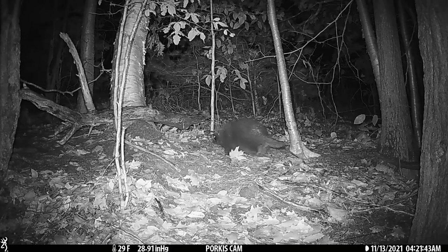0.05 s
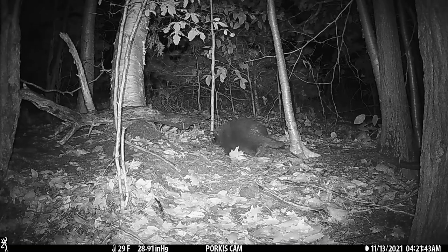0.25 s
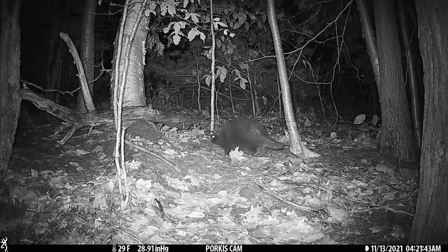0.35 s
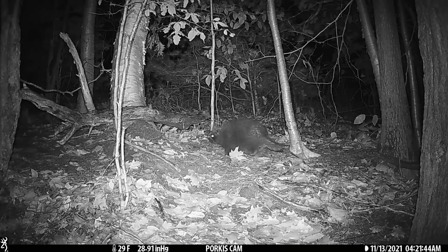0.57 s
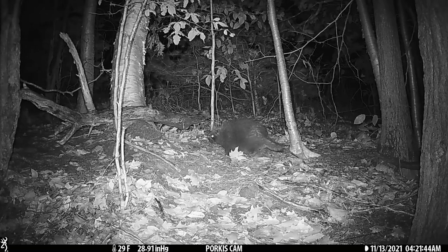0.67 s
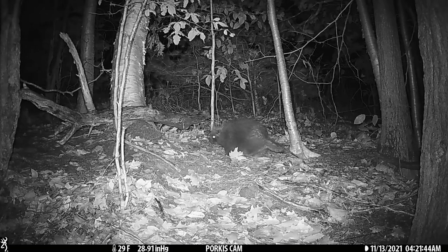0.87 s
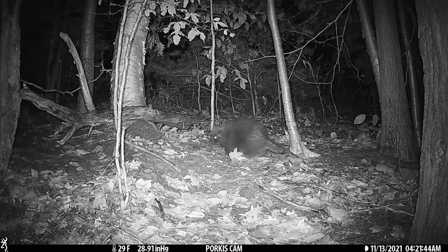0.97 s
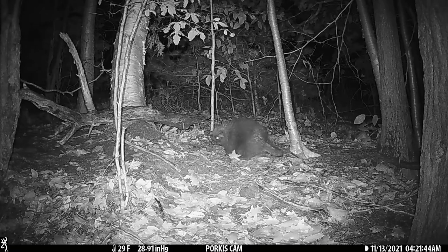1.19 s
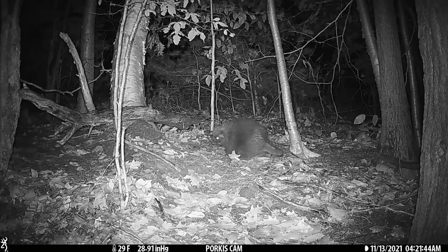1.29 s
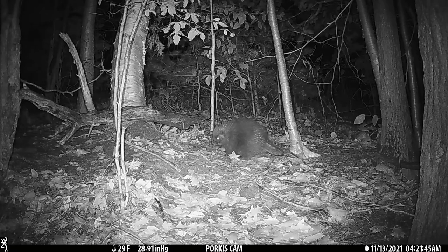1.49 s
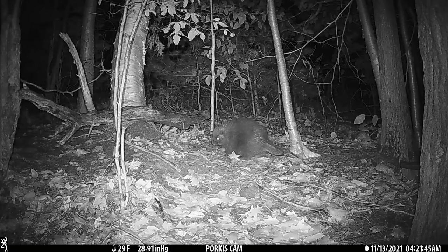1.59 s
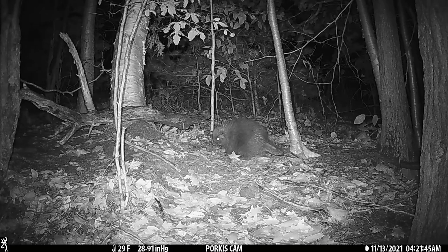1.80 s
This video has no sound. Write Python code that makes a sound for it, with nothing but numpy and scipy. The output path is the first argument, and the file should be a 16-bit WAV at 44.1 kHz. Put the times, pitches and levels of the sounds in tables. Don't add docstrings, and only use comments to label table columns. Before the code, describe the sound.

Crisp leaf rustling from an animal foraging at night, with soft electronic hiss and thin whine

```python
import sys
import numpy as np
from scipy import signal
from scipy.fft import rfft, irfft
from scipy.io import wavfile
from scipy.ndimage import uniform_filter1d

SR = 44100
rng = np.random.default_rng(int(sys.argv[2]) if len(sys.argv) > 2 else 0)


def rack_gain(trim_db):
    fader = np.asarray(trim_db, float)
    return 10 ** (fader / 20)


def dump_mix(stems):
    frames = np.atleast_2d(stems).T
    limited = np.clip(frames, -1, 1)
    pcm = np.round(limited * 32767).astype(np.int16)
    wavfile.write(sys.argv[1], SR, pcm)


N = 81585


def stirs():
    # start in seconds, length in seconds, level in dB, brightness in dB per octave.
    drags = [(0, 0.024, -53, 6.5), (.05, .022, -66, 6), (.127, 0.016, -51, -1.5), (.15, 0.0085, -62, 1),
             (.215, 0.026, -49, -1.5), (.249, 0.036, -48.5, -0.5), (.329, 0.0042, -41, -2),
             (.351, 0.017, -45.5, 12.5), (.407, 0.031, -51.5, 6), (.452, 0.052, -53.5, 4.5),
             (.502, 0.04, -50, 3), (.549, 0.011, -50.5, -2), (.375, 0.0066, -44, 10.5),
             (.658, 0.015, -57, 16.5), (.792, 0.038, -51, 1), (.82, 0.038, -52, -4),
             (.962, 0.0078, -58, 10), (1.056, 0.011, -57, 3), (1.128, 0.028, -51, -5.5),
             (1.177, 0.016, -57.5, -6), (1.232, 0.013, -52, -9), (1.267, 0.028, -48.5, -2),
             (1.324, 0.016, -50, 1), (1.349, 0.07, -48, -2.5), (1.439, 0.035, -50, -2),
             (1.472, 0.034, -52, -6), (1.506, 0.033, -51.5, -6), (1.562, 0.023, -51.5, 0),
             (1.583, 0.016, -49, -6.5), (1.637, 0.023, -51, -7)]
    return runs(drags, per_s=1100, spread_db=4.2, gain_db=10.5, fade_db=4.5)


def crushes():
    # start in seconds, length in seconds, level in dB, brightness in dB per octave.
    bursts = [(.092, 0.0082, -55, 14), (.259, 0.0027, -44.5, 3), (.3025, 0.0054, -43, 11),
              (.316, 0.014, -42.5, -6), (.3455, 0.0052, -35.5, 4), (.335, 0.0058, -38, 16.5),
              (.386, 0.005, -38, 18.5), (.397, .009, -43, 8), (.497, 0.0029, -52, 25.5),
              (.5665, 0.0058, -41, 5.5), (.571, 0.0086, -42, -6), (.604, 0.0022, -43.5, -5),
              (.625, 0.0046, -55, -25), (.652, 0.0033, -37.5, 4), (.708, 0.0021, -46.5, 12),
              (.724, 0.0046, -52.5, 5), (.754, 0.012, -42.5, 3), (.766, 0.007, -41, -1),
              (.775, 0.0089, -39.5, -9), (.787, 0.0055, -43.5, 12.5), (.949, 0.0055, -42.5, 5),
              (1.0305, 0.0021, -43.5, 4), (1.042, 0.0053, -43, -7.5), (1.165, 0.0045, -46.5, -14),
              (1.2255, 0.0058, -41, 0), (1.252, 0.0048, -40.5, -3), (1.261, 0.0065, -45, 6),
              (1.297, 0.0085, -57, -9), (1.422, .013, -54, 25), (1.552, 0.007, -45.5, 3),
              (1.624, 0.0038, -47.5, -13.5)]
    return runs(bursts, per_s=2400, spread_db=4, gain_db=5, fade_db=2)


def snaps():
    # time of the peak in seconds, peak level in dB, pitch in Hz.
    breaks = [(0.0939, -40, 3880), (0.2608, -37, 4090), (0.2631, -33, 3660), (0.281, -36, 4310),
              (0.3032, -32, 2670), (0.306, -37, 2630), (0.3183, -34, 4570), (0.3366, -34, 3450),
              (0.3386, -34, 3140), (0.3406, -26, 3270), (0.3449, -19, 3530), (0.3488, -27, 3450),
              (0.3532, -35, 3700), (0.3557, -35, 3270), (0.359, -33, 3490), (0.3625, -29, 3620),
              (0.3661, -29, 3140), (0.3698, -32, 4480), (0.3864, -26, 3790), (0.3899, -27, 4480),
              (0.3974, -29, 3750), (0.4014, -32, 3530), (0.4049, -36, 4480), (0.4988, -38, 4690),
              (0.5624, -38, 4350), (0.5671, -31, 3880), (0.5703, -33, 4350), (0.572, -35, 1890),
              (0.5754, -36, 2240), (0.605, -41, 4260), (0.6526, -27, 3830), (0.6546, -37, 4050),
              (0.7554, -37, 4350), (0.7667, -36, 4440), (0.7711, -30, 2150), (0.7778, -32, 2070),
              (0.7811, -33, 2240), (0.7847, -38, 3960), (0.7883, -33, 4950), (0.7901, -32, 4010),
              (1.0316, -37, 2580), (1.1656, -40, 4350), (1.2269, -36, 2580), (1.2294, -35, 2540),
              (1.2534, -36, 4310), (1.2551, -35, 3270), (1.2629, -38, 1890), (1.2648, -35, 3400),
              (1.2724, -39, 3790), (1.331, -34, 4090), (1.3402, -37, 3490), (1.3427, -39, 2760),
              (1.3905, -38, 2280), (1.4293, -34, 4610), (1.4316, -37, 4390), (1.4362, -32, 2070),
              (1.4394, -39, 2110), (1.4655, -39, 2110), (1.5855, -39, 2370), (1.6553, -39, 2930)]
    peak_s, db, hz = np.transpose(breaks)[:, :, None]
    ring_db, crack_db = -2, -3
    rise_s = 1.5 / hz
    start_s = peak_s - rise_s

    step = np.arange(300)
    t = step / SR
    envelope = rack_gain(db + ring_db) * t / rise_s * np.exp(1 - t / rise_s)
    ring = envelope * np.sin(2 * np.pi * (hz * t + rng.random((len(peak_s), 1))))
    at = (start_s * SR).astype(int) + step
    rings = np.bincount(at.ravel(), ring.ravel(), N)
    no_thump = signal.butter(2, 725, "high", fs=SR, output="sos")
    rings = signal.sosfilt(no_thump, rings)

    bright_db = 8 * np.log2(hz / 3000)
    return rings + crackle(start_s.ravel(), (db + crack_db).ravel(), bright_db.ravel())


def runs(rows, per_s, spread_db, gain_db, fade_db):
    start, length, db, bright = np.transpose(rows)[:, :, None]
    attack_db, attack_s = 7, 0.0022
    gaps = rng.exponential(1, (len(rows), 110))
    late = (np.cumsum(gaps, axis=1) - gaps[:, :1]) / per_s

    size_db = spread_db * np.minimum(rng.exponential(1, late.shape), 3)
    size_db -= fade_db * late / length
    size_db -= 60 * np.clip((late - length) / .002, 0, 3)
    size_db -= attack_db * np.exp(-late / attack_s)

    power_db = 10 * np.log10(np.sum(rack_gain(2 * size_db), axis=1, keepdims=True) / (length * per_s))
    level_db = db + gain_db + size_db - power_db
    return crackle((start + late).ravel(), level_db.ravel(), (bright + 0 * late).ravel())


def crackle(s, db, bright_db):
    # frequency in Hz, level of the leaf modes in dB.
    colour = [(1400, -28.5), (2000, -9.5), (3000, -6.5), (4200, -4), (5200, -7), (6000, -14.5), (7000, -25),
              (8000, -34)]
    mode_spread_db, ring_cycles = 4.5, 6.53
    at = np.clip((s * SR).astype(int), 0, N - 1)
    luck = rack_gain(mode_spread_db * np.clip(rng.standard_normal((len(s), 18)), -2, 2))
    luck = luck / np.sqrt(np.mean(luck[:, 4:14] ** 2, axis=1, keepdims=True))
    sign = rng.choice([-1, 1], len(s))

    out = np.zeros(N)
    for k, hz in enumerate(np.geomspace(1400, 7600, 18)):
        tilt_db = bright_db * np.log2(np.clip(hz, 1900, 4800) / 3000)
        gain = rack_gain(db + at_hz(colour, hz) + tilt_db) * luck[:, k]
        strikes = np.bincount(at, sign * gain, N)
        out += double_resonance(strikes, hz, hz / ring_cycles) * 3000 / hz
    leaf_band = signal.butter(3, [1450, 7200], "band", fs=SR, output="sos")
    return 12 * signal.sosfilt(leaf_band, out)


def knocks():
    # time in seconds, level in dB.
    thuds = [
        (.02, -57.5),
        (.578, -55),
        (0.626, -54.5),
        (1.506, -56),
    ]
    s, db = np.transpose(thuds)
    hits = np.bincount((s * SR).astype(int), 60 * rack_gain(db), N)
    return double_resonance(hits, hz=684, width_hz=790)


def woods(x):
    t60_s, scatter_db = .05, -12
    t = np.arange(SR // 10) / SR
    tail = rng.standard_normal(len(t)) * rack_gain(-60 * t / t60_s)
    tail *= rack_gain(scatter_db) / np.sqrt(np.sum(tail ** 2))
    tail[0] = 1
    return signal.fftconvolve(x, tail)[:N]


def port(x):
    port_hz, above_db = 5780, -2
    below = signal.cheby2(6, 40, 1.25 * port_hz, fs=SR, output="sos")
    above = signal.butter(4, port_hz, "high", fs=SR, output="sos")
    return signal.sosfilt(below, x) + rack_gain(above_db) * signal.sosfilt(above, x)


def notches(x):
    # centre in Hz, width in Hz, depth from 0 to 1.
    dips = [(5480, 450, .95), (11000, 900, .6), (13150, 300, .35)]
    for hz, width_hz, depth in dips:
        x = x - depth * resonance(x, hz, width_hz)
    return x


def whine():
    # time in seconds, pitch of the second partial in Hz.
    course = [(0, 8430), (.1, 8540), (.2, 8620), (.32, 8440), (.4, 8480), (.44, 8600), (.675, 8760),
              (.705, 8280), (.82, 8450), (.84, 8760), (1.05, 8500), (1.3, 8500), (1.34, 8800), (1.42, 8770),
              (1.5, 8480), (1.62, 8830), (1.78, 8600), (1.85, 8800)]
    # time in seconds, shift of that pitch in Hz, half length in seconds.
    slips = [(.04, -120, .03), (.158, -420, .035), (.195, 120, .02), (.255, -90, .02), (.285, 150, .015),
             (.49, -130, .015), (.53, 110, .02), (.605, -160, .025), (.635, 170, .015), (.73, 200, .015),
             (.75, -130, .015), (.78, 150, .015), (.93, -170, .02), (.96, 100, .02), (1.05, -170, .015),
             (1.1, 290, .025), (1.22, 120, .02), (1.5, -100, .01), (1.58, -190, .012), (1.665, 80, .015),
             (1.69, -200, .025), (1.77, -110, .012), (1.83, 120, .01)]
    waver_hz, flutter_hz = 34, 58
    t = np.arange(N) / SR
    second_hz = np.interp(t, *np.transpose(course))
    for s, shift_hz, half_s in slips:
        second_hz += shift_hz * np.clip(1 - np.abs(t - s) / half_s, 0, 1)

    waver = drift(40)
    waver = rms_one(waver - uniform_filter1d(waver, size=1500))
    flutter = rms_one(uniform_filter1d(drift(169), size=40))
    hz = second_hz / 2 + waver_hz * waver + flutter_hz * flutter

    phase = 2 * np.pi * np.cumsum(hz) / SR
    partials_db = (-58, -66, -96)
    return np.sqrt(2) * sum(rack_gain(db) * np.sin(k * phase) for k, db in enumerate(partials_db, 1))


def hiss():
    # frequency in Hz, spectral level in dB.
    spectrum = [(25, 0), (150, -6), (800, 2), (3500, -2), (5000, -1), (7000, -11.5), (10000, -12),
                (15500, -22)]
    white = rng.standard_normal((2, N))
    hz = np.maximum(np.fft.rfftfreq(N, 1 / SR), 1)
    low_cut = np.minimum(hz / 60, 1) ** 2
    smooth = irfft(rfft(white[0]) * rack_gain(at_hz(spectrum, hz)) * low_cut, N)
    tone = resonance(white[1], hz=2522, width_hz=44)
    return rack_gain(-62) * rms_one(smooth) + rack_gain(-71) * rms_one(tone)


def resonance(x, hz, width_hz):
    r = np.exp(-np.pi * width_hz / SR)
    zeros = [(1 - r * r) / 2, 0, (r * r - 1) / 2]
    poles = [1, -2 * r * np.cos(2 * np.pi * hz / SR), r * r]
    return signal.lfilter(zeros, poles, x + 1e-18)


def double_resonance(x, hz, width_hz):
    return resonance(resonance(x, hz, width_hz), hz, width_hz)


def drift(rate_hz):
    r = np.exp(-2 * np.pi * rate_hz / SR)
    walk = signal.lfilter([1], [1, -r], rng.standard_normal(N + 9000))
    return rms_one(walk[9000:])


def at_hz(points, hz):
    f, db = np.transpose(points)
    return np.interp(np.log(hz), np.log(f), db)


def rms_one(x):
    return x / np.sqrt(np.mean(x ** 2) + 1e-20)


def scene():
    animal = stirs() + crushes() + snaps() + knocks()
    mono = notches(port(woods(animal)) + hiss()) + whine()
    return np.tile(mono, (2, 1))


def top_cut(x):
    return signal.sosfilt(signal.butter(12, 15720, fs=SR, output="sos"), x)


def record(dry):
    low_pass = signal.cheby2(12, 60, 16320, fs=SR, output="sos")
    mix = signal.sosfilt(low_pass, dry)
    return top_cut(mix)


dry = scene()
out = record(dry)
dump_mix(out)
```